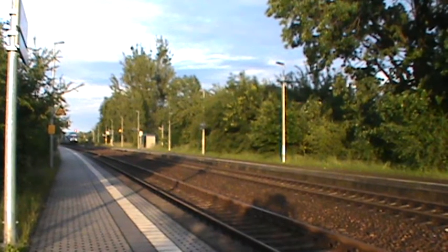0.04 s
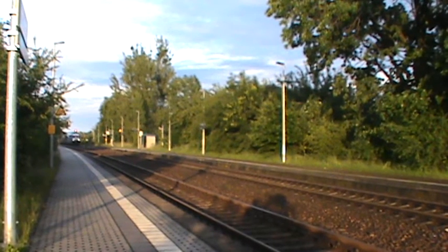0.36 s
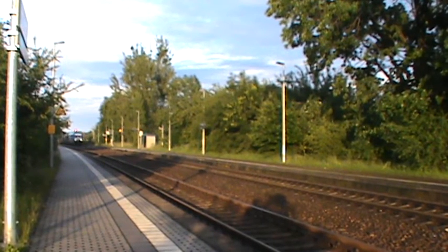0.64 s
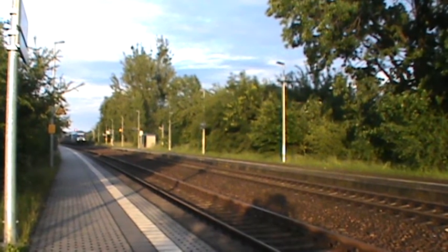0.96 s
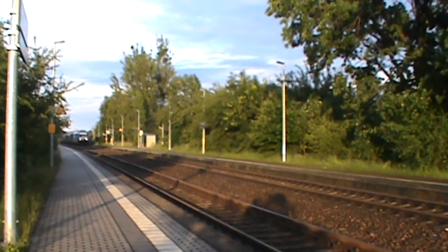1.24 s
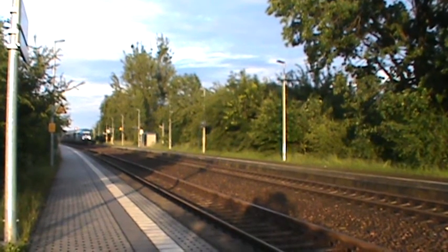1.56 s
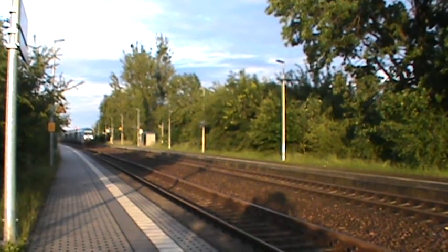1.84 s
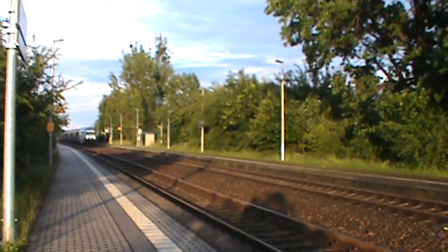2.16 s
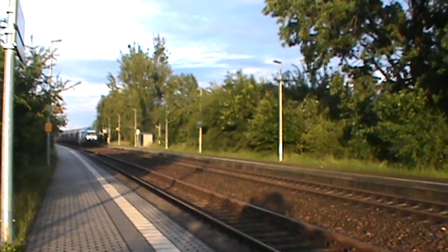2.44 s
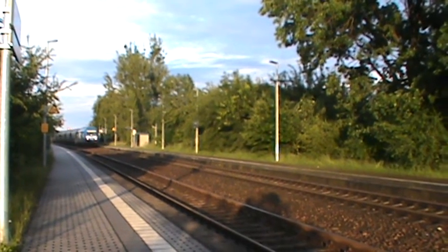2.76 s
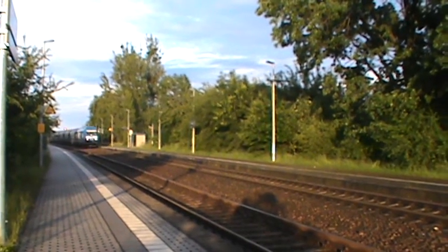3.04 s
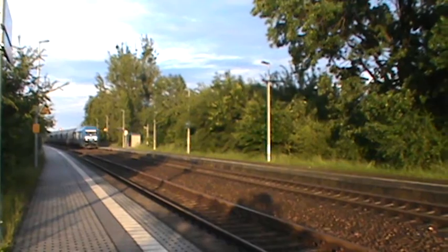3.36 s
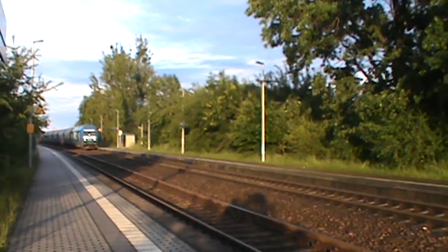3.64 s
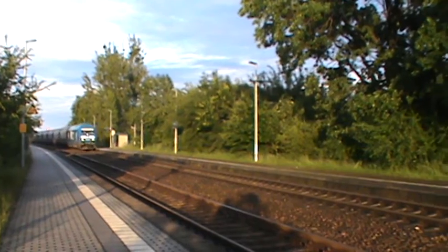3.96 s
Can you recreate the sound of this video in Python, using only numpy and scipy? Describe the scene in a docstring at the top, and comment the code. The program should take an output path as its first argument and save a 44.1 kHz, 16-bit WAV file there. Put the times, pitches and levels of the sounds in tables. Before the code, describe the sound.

High metallic sizzling from the rails grows over an approaching freight train's low rumble.

```python
"""A country platform, with a freight train approaching from far off. Its wheels excite the rails, which
sing ahead of it: two clusters of very high steel resonances sizzle in bursts that merge and grow, with
brief squeals, a lower ring and two twangs, knocks that the rail disperses into glides. Behind them the
locomotive hums and rumbles, and the rolling roar and hiss of the wagons slowly rise."""
import sys
import numpy as np
from scipy import signal
from scipy.fft import rfft, irfft
from scipy.io import wavfile
from scipy.ndimage import uniform_filter1d

SR = 44100
rng = np.random.default_rng(int(sys.argv[2]) if len(sys.argv) > 2 else 0)


def wav_record(signal):
    """Record a signal, one row per channel, as 16-bit PCM in the file named by sys.argv[1]."""
    frames = np.transpose(np.atleast_2d(signal))
    bounded = np.clip(frames, -1, 1)
    # unit amplitude maps onto the largest positive 16-bit level
    quanta = np.round(bounded * 32767).astype(np.int16)
    wavfile.write(sys.argv[1], SR, quanta)


N = 176400
T, HZ = np.arange(N) / SR, np.arange(N // 2 + 1) * SR / N

# All levels in the tables are relative.
# rail modes of the two clusters and the lower ring (frequency [Hz], bandwidth [Hz], level [dB])
LOW_CLUSTER_MODES = [(8598, 112, -20), (8821, 102, -9), (8990, 120, -11), (9110, 120, -10), (9260, 85, 0),
                     (9420, 60, -7), (9520, 110, -9), (9650, 40, -7), (9722, 65, -2), (9925, 140, -7),
                     (10190, 120, -4), (10393, 150, -10), (10595, 110, -9), (10820, 349, -16)]
HIGH_CLUSTER_MODES = [(13095, 100, -5), (13290, 83, -4), (13539, 100, -4), (13778, 125, -5),
                      (14000, 110, 0), (14240, 130, -1), (14451, 130, -3), (14672, 135, -1),
                      (14902, 135, -1), (15115, 140, 0), (15350, 160, -2), (15560, 130, -5),
                      (15720, 110, -11)]
RAIL_RING_MODES = [(1640, 90, -9), (1735, 60, -3), (1818, 65, 0)]
# envelopes of the two clusters and the lower ring (time [s], level [dB])
LOW_ENVELOPE = [(0.0, -78), (0.37, -72), (0.71, -60.5), (0.86, -69), (0.95, -40.5), (0.99, -54),
                (1.02, -41), (1.25, -42), (1.27, -55.5), (1.54, -61.5), (1.55, -33.5), (1.73, -63),
                (1.88, -63.5), (1.97, -51.5), (2.07, -68), (2.13, -39), (2.25, -33), (2.47, -47.5),
                (2.51, -34.5), (2.57, -46), (2.65, -37), (2.66, -46), (2.73, -35.5), (2.78, -53),
                (2.82, -28.5), (2.84, -28.5), (2.92, -28), (2.99, -27), (3.06, -37), (3.19, -36.5),
                (3.23, -25), (3.38, -29), (3.43, -26.5), (3.45, -30), (3.56, -28), (3.59, -30.5),
                (3.63, -28), (3.81, -23.5), (3.99, -27.5), (4.0, -21.5)]
HIGH_ENVELOPE = [(0.0, -71), (0.32, -70), (0.53, -56), (0.69, -64), (0.73, -49), (0.8, -68), (0.85, -55),
                 (0.86, -67), (0.88, -42), (0.98, -51), (1.06, -39), (1.08, -47), (1.25, -41.5),
                 (1.29, -60), (1.37, -47), (1.43, -67), (1.53, -66), (1.55, -39), (1.61, -49), (1.63, -40),
                 (1.68, -56), (1.94, -57), (1.97, -52), (2.06, -58), (2.12, -33.5), (2.33, -37),
                 (2.34, -38), (2.44, -27.5), (2.47, -40), (2.52, -30), (2.73, -34.5), (2.77, -42),
                 (2.83, -31.5), (3.02, -32), (3.12, -29), (3.25, -30), (3.79, -29.5), (3.85, -32.5),
                 (3.98, -25.5), (4.0, -22)]
RING_ENVELOPE = [(0, -68), (.66, -63.5), (.73, -55), (.82, -68), (.875, -45), (.96, -59.5), (1.08, -46.5),
                 (1.15, -52.5), (1.53, -58), (1.58, -46), (1.65, -59), (1.705, -47), (1.77, -54),
                 (2.5, -50), (2.9, -50.5), (2.95, -43.5), (3.02, -50.5), (3.49, -46.5), (4, -49)]
# flares of single resonances (time [s], duration [s], frequency [Hz], bandwidth [Hz], level [dB])
RAIL_SQUEALS = [(.43, .03, 15500, 500, -57), (.56, .06, 13350, 350, -58), (.62, .2, 14250, 90, -59),
                (.841, .01, 15400, 700, -36), (.885, .035, 15200, 700, -39), (.95, .15, 14250, 80, -49),
                (1.15, .25, 9930, 45, -45), (1.6, .08, 9925, 45, -46), (2.375, .06, 13105, 70, -32),
                (2.585, .045, 13100, 70, -29), (3.15, .1, 14010, 70, -35)]
# knocks dispersed by the rail (time [s], start frequency [Hz], end frequency [Hz], level [dB])
RAIL_TWANGS = [(.855, 1600, 1815, -39), (1.697, 1810, 1540, -39)]
# partials of the engine hum (harmonic number [1], level [dB])
HUM_HARMONICS = [(1, -1), (2, -7.5), (4, -9), (5, 0)]
# dull thuds in the rumble (time [s], frequency [Hz], level [dB])
RUMBLE_THUDS = [(.66, 74.6, -43), (1.096, 95, -46), (1.225, 70, -42), (1.34, 84, -40)]
# spectral densities of the train's noises (frequency [Hz], level [dB])
RUMBLE_SPECTRUM = [(15, -5), (32, -20), (42, 3), (58, 0), (100, -0.5), (150, -4.5), (200, -5), (260, -9),
                   (340, -19.5), (600, -52.5)]
ROAR_SPECTRUM = [(180, -24), (295, 1), (350, -5.5), (440, 1.5), (590, 0.5), (720, -1.5), (930, -2),
                 (1020, -7.5), (1130, -1.5), (1270, 0), (1430, -4), (1700, -4.5), (1980, -8.5), (2400, -5),
                 (2620, -2), (2880, -7.5), (3250, -7), (3700, -11), (4500, -15), (8000, -33.5)]
HISS_SPECTRUM = [(2000, -4.5), (3500, -1), (5000, 0.5), (7000, -1), (8400, -1), (11000, -2.5),
                 (12600, -6.5), (16000, -4)]
# envelopes of the locomotive and wagon sounds (time [s], level [dB])
HUM_ENVELOPE = [(0, -65), (.11, -57.5), (.92, -63), (1.24, -58.5), (1.8, -57), (2.2, -51), (3.2, -48.5),
                (3.7, -45.5), (4, -47.5)]
RUMBLE_ENVELOPE = [(0, -53), (.6, -54), (.66, -51), (.8, -52), (1.15, -49.5), (1.33, -48), (1.5, -46),
                   (1.75, -48), (1.95, -47), (2.5, -45), (3.1, -44), (3.45, -47.5), (4, -43)]
ROAR_ENVELOPE = [(0, -52.5), (.4, -52), (.9, -49.5), (1.65, -46.5), (1.85, -47), (2.6, -44), (3.6, -43),
                 (3.88, -44.5), (4, -43)]
HISS_ENVELOPE = [(0, -61), (.44, -61.5), (1.1, -56), (1.6, -53.5), (1.83, -57.5), (2.1, -52), (2.39, -55),
                 (2.53, -50.5), (3.56, -43), (3.85, -44), (4, -39.5)]


def rail_song():
    """Forced vibration: uneven contact of wheel and rail modulates two clusters of rail modes."""
    lead_rad = np.interp(HZ, [8700, 10600], [2.1, 1.25])
    low = cluster(LOW_CLUSTER_MODES, flicker_db=3.2, flicker_hz=3.1, rise_db_per_s=5.5,
                  side_db=-14, lead_rad=lead_rad, pan_db=2)
    high = cluster(HIGH_CLUSTER_MODES, flicker_db=2.2, flicker_hz=7.7, side_db=-16.5, pan_db=0.5)
    contact = wheel_jolts()
    low *= envelope(LOW_ENVELOPE) * undb(4 + 0.66 * contact + wander(250))
    high *= envelope(HIGH_ENVELOPE) * undb(0.1 + 0.84 * contact + wander(250))
    # weak resonances fill the gap between the clusters
    between = noise(resonance(12010, 400) + 0.24 * resonance(10700, 2500), side_db=-12)
    between *= envelope(HIGH_ENVELOPE) * undb(-17.5 + 8 * (T - 3) + 1.8 * wander(12))
    return low + high + between


def cluster(modes, flicker_db, flicker_hz, rise_db_per_s=0, **stereo):
    """Modal superposition: noise-driven rail modes swell independently at constant total power."""
    edge_hz = 10050  # modes above this carry less far, so they can gain as the train nears
    core_width_hz = 42  # the narrow, long-ringing core of each mode
    total, power = 0, 0
    for hz, width, db in modes:
        approach_db = (hz > edge_hz) * rise_db_per_s * (T - 3.5)
        gain = undb(db + flicker_db * wander(flicker_hz) + approach_db)
        core = undb(-11) * np.sqrt(width / core_width_hz) * resonance(hz, core_width_hz)
        total += gain * noise(np.hypot(resonance(hz, width), core), **stereo)
        power += gain ** 2
    return total / np.sqrt(power)


def wheel_jolts(per_second=30, decay_s=0.01):
    """Shot noise: rough spots on the wheels strike at random, and each jolt decays exponentially."""
    kicks = (rng.random(N) < per_second / SR) * rng.uniform(.5, 1, N)
    jolts = signal.lfilter([1], [1, -np.exp(-1 / (decay_s * SR))], kicks)
    jolts -= uniform_filter1d(jolts, size=SR // 6)
    return jolts / jolts.std()


def squeals():
    """Narrow-band resonance: single rail modes flare and fade under Gaussian envelopes."""
    return sum(noise(resonance(hz, width), side_db=-17) * undb(db) * np.exp(-2 * ((T - at) / span) ** 2)
               for at, span, hz, width, db in RAIL_SQUEALS)


def rail_ring():
    """Incoherent addition: three lower rail modes sum in power to one ringing band."""
    shape = np.sqrt(sum((undb(db) * resonance(hz, width)) ** 2 for hz, width, db in RAIL_RING_MODES))
    ring = noise(shape, side_db=-9, lead_rad=0.41, pan_db=-3)
    return ring * envelope(RING_ENVELOPE) * undb(.7 * wander(22))


def twangs(glide_s=.009, attack_s=.003, decay_s=.016):
    """Dispersion: frequencies travel along the rail at different speeds, so a knock becomes a glide."""
    total = 0
    for at, start_hz, end_hz, db in RAIL_TWANGS:
        age = np.maximum(T - at, 0)
        pitch_hz = end_hz + (start_hz - end_hz) * np.exp(-age / glide_s)
        phase = 2 * np.pi * np.cumsum(pitch_hz) / SR
        flutter = wander(130) * np.sin(phase) + wander(130) * np.cos(phase)
        gain = 2 * undb(db) * np.minimum(age / attack_s, 1) * np.exp(-age / decay_s)
        total += gain * (np.sin(phase) + .5 * flutter)
    return total


def locomotive(engine_hz=43.27, thud_s=0.011):
    """Harmonic series: the nearly periodic engine hums over a noisy rumble with a few thuds."""
    phase = 2 * np.pi * np.cumsum(engine_hz * (1 + 0.0029 * wander(3.24))) / SR
    hum = sum(undb(db + 2.97 * wander(7.3)) * np.sin(k * phase + 0.16 * k * wander(10.6))
              for k, db in HUM_HARMONICS)
    hum *= envelope(HUM_ENVELOPE) * undb(-.5)
    rumble = noise(spectrum(RUMBLE_SPECTRUM), side_db=np.interp(HZ, [80, 300], [-27, -14]), pan_db=-0.1)
    rumble *= envelope(RUMBLE_ENVELOPE) * undb(.5)
    thuds = sum(undb(db) * np.exp(-((T - at) / thud_s) ** 2) * np.sin(2 * np.pi * hz * (T - at))
                for at, hz, db in RUMBLE_THUDS)
    return np.sqrt(2) * (hum + thuds) + rumble


def wagons():
    """Rolling noise: distant wheels radiate a broadband roar and hiss that rise as they near."""
    roar = noise(spectrum(ROAR_SPECTRUM), side_db=-9.5, lead_rad=.1, pan_db=1.1)
    roar *= envelope(ROAR_ENVELOPE) * undb(-.5 + .5 * wander(6.4))
    hiss = noise(spectrum(HISS_SPECTRUM), side_db=-9, pan_db=-0.2)
    hiss *= envelope(HISS_ENVELOPE) * undb(2 + .5 * wander(30))
    return roar + hiss


def noise(shape, side_db, lead_rad=0, pan_db=0):
    """Partial coherence: stereo noise of unit rms with a diffuse share and a phase lead on the left."""
    mid, side = rfft(rng.standard_normal((2, N))) * shape
    sign = np.array([[1], [-1]])
    channels = (mid + sign * undb(side_db) * side) * np.exp(sign * 1j * lead_rad / 2)
    stereo = irfft(channels, N) * undb(sign * pan_db / 2)
    return stereo / np.sqrt(np.mean(stereo ** 2))


def wander(rate_hz):
    """Random modulation: low-pass noise of unit rms."""
    drift = irfft(rfft(rng.standard_normal(N)) * np.exp(-(HZ / rate_hz) ** 2), N)
    return drift / np.sqrt(np.mean(drift ** 2))


def resonance(hz, width):
    """Lorentzian gain over frequency, with its full width taken at half amplitude."""
    return 1 / (1 + (2 * (HZ - hz) / width) ** 2)


def spectrum(rows):
    """Gain interpolated over log frequency from (frequency [Hz], level [dB])."""
    hz, db = np.array(rows).T
    return undb(np.interp(np.log(HZ + 1), np.log(hz), db))


def envelope(rows):
    """Gain interpolated over time from (time [s], level [dB])."""
    return undb(np.interp(T, *np.array(rows).T))


def undb(db):
    """Amplitude ratio of a level in decibels."""
    return 10 ** (np.asarray(db) / 20)


def scene():
    """Linear superposition: the singing rails in front, the train behind."""
    return rail_song() + squeals() + rail_ring() + twangs() + locomotive() + wagons()


def record(dry):
    """Band limiting: a steep elliptic low-pass removes the highest treble."""
    cutoff_hz = 15750
    return signal.sosfilt(signal.ellip(12, .1, 80, cutoff_hz, fs=SR, output="sos"), dry)


dry = scene()
out = record(dry)
wav_record(out)
```